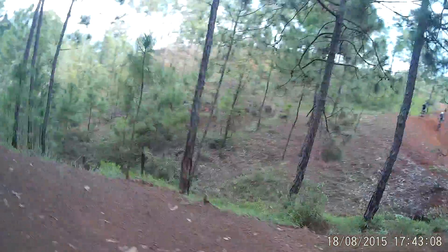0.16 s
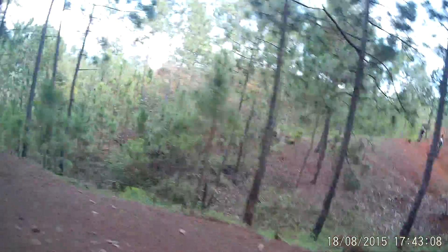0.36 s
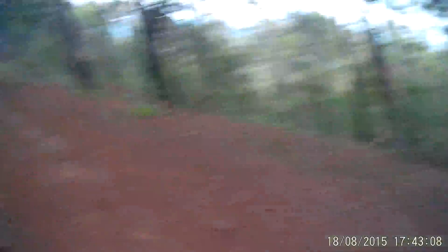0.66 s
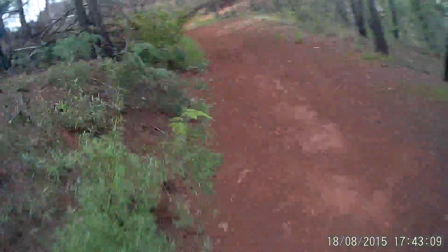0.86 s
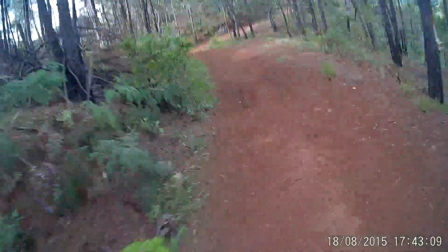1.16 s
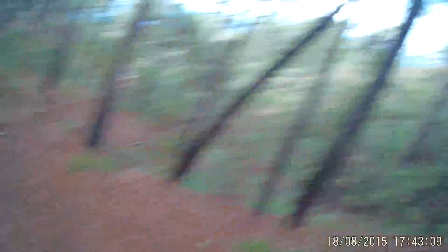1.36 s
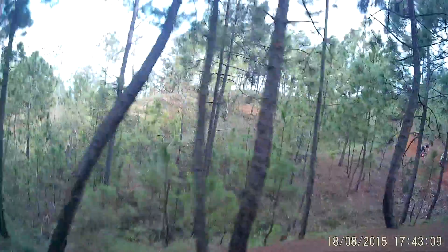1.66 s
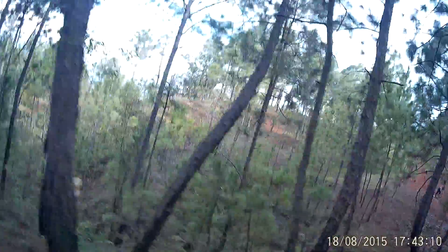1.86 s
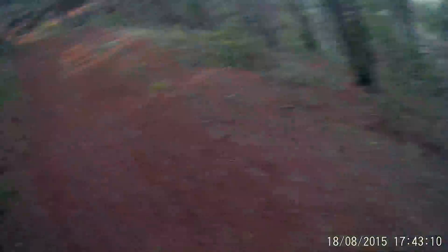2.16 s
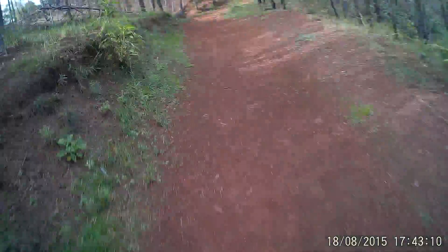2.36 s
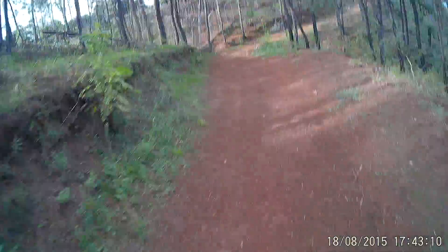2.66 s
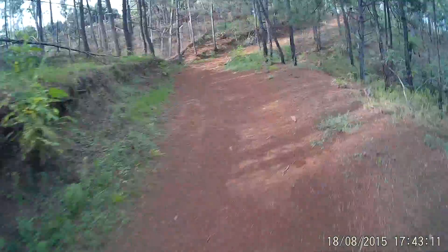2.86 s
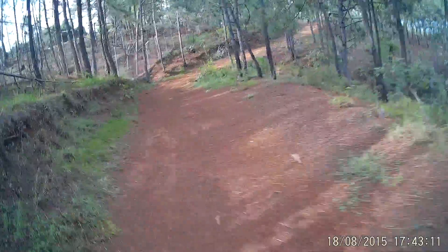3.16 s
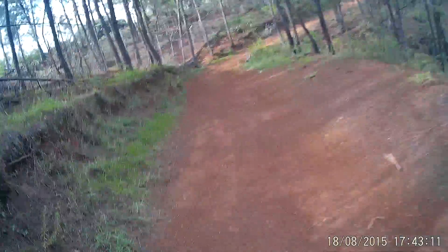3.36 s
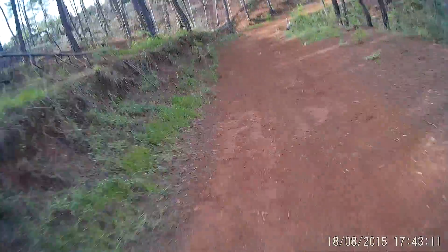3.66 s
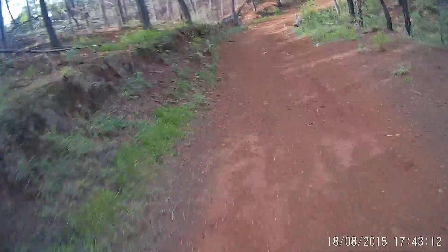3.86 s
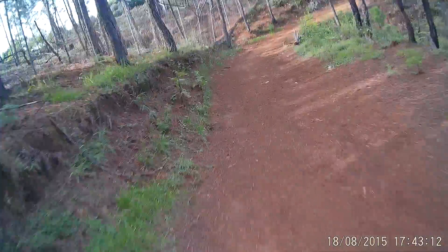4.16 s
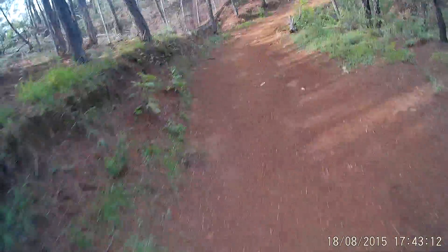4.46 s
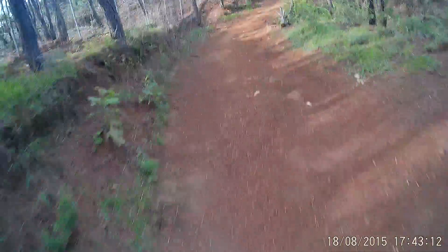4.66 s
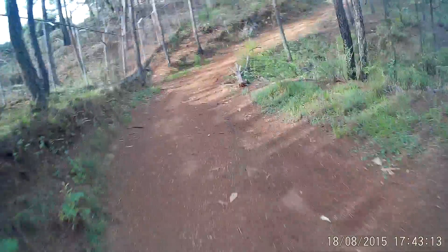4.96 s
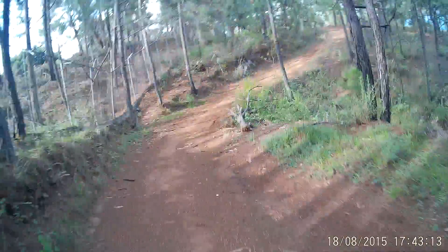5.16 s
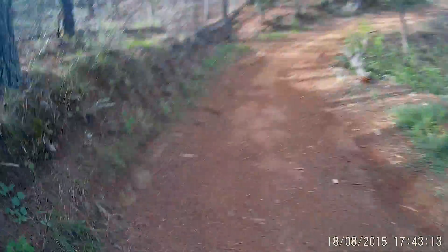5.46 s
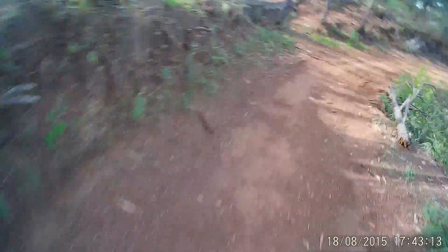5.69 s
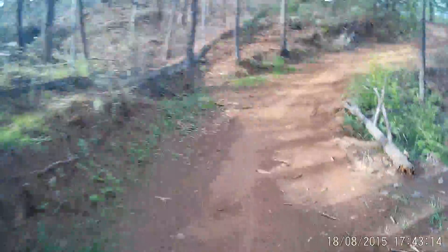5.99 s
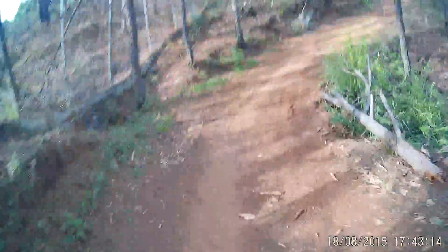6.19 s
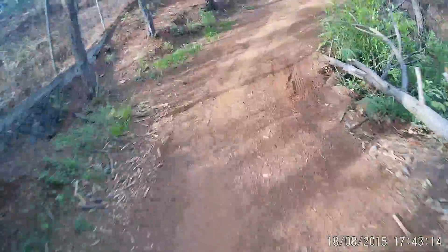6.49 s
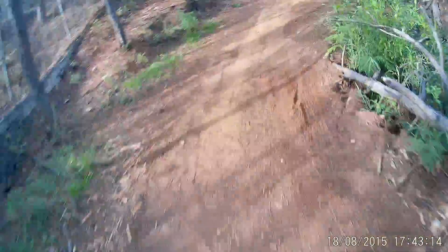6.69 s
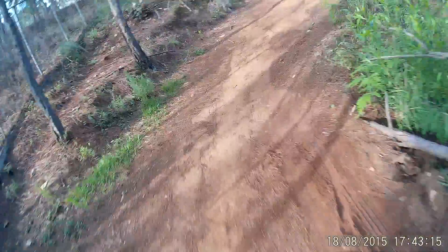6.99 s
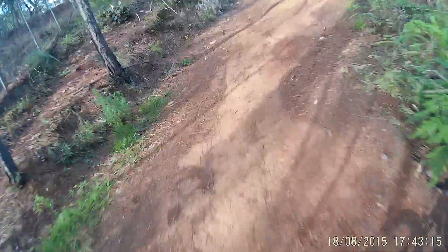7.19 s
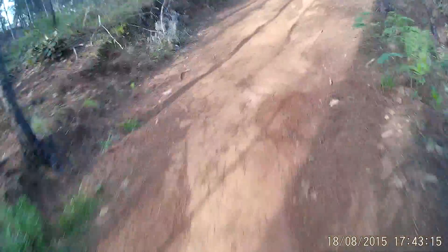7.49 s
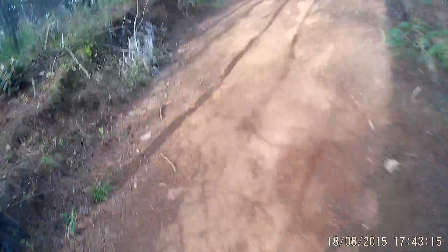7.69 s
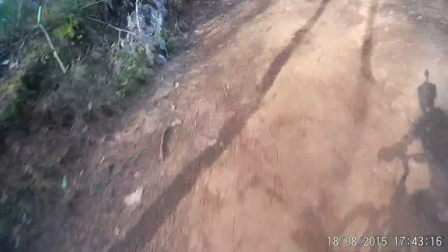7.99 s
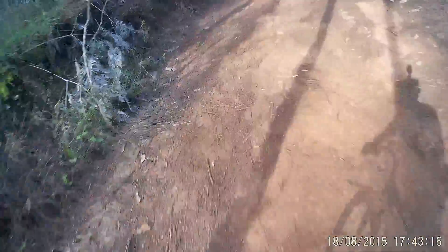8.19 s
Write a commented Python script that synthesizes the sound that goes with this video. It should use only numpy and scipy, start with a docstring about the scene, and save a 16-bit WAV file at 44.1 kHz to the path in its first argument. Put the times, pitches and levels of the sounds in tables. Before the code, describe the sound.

Close, boxy and muffled handling noise from a bike-mounted camera on a forest dirt path: hollow plastic raps, bright snapping of loose parts, low mount thumps and brief creaky squeaks. Busy at first, calmer in the middle with only small ticks and soft rumble, then busy again, ending in a furious burst of chatter and a few last taps. Faint tyre hiss and a very weak high whine lie underneath.

```python
"""A bike frame sways and buzzes throughout, with faint tyre hiss, as a mountain bike jolts along rough dirt.
A camera in a plastic case on the bike hears it: filtered noise makes the sway and hiss, random grains the rattle.
Small stones tick, loose parts clack, and the case squeaks in its clamp as friction noise in high resonances.
Bumps knock the case as chattering force through resonances and rock its mount as damped modes.
A few blows leave a steel part ringing."""
import sys
import numpy as np
from scipy import signal
from scipy.fft import rfft, irfft, next_fast_len
from scipy.io import wavfile
from scipy.ndimage import uniform_filter1d, map_coordinates

SR = 44100
rng = np.random.default_rng(int(sys.argv[2]) if len(sys.argv) > 2 else 0)


def waveform_to_disk(signal):
    """Save audio, clipped to [-1, 1], as 16-bit WAV at the path in sys.argv[1]."""
    frames = np.transpose(np.atleast_2d(signal))
    scaled = np.clip(frames, -1, 1) * 32767
    samples = np.round(scaled).astype(np.int16)
    wavfile.write(sys.argv[1], SR, samples)


N = 367794


def amp(db):
    """Decibel law: 20 dB is a tenfold amplitude."""
    return 10 ** (np.asarray(db) / 20)


def unit(x):
    """Mean-square normalisation: scaled to rms 1."""
    return x / np.sqrt(np.mean(x ** 2) + 1e-20)


def crest(x, size=220):
    """Short-time normalisation: the most energetic window of size samples gets rms 1."""
    power = uniform_filter1d(x ** 2, size, mode="constant")
    return x / np.sqrt(power.max() + 1e-20)


def curves(rows):
    """Linear interpolation: one value per sample for each column after the time."""
    times_s, *columns = np.transpose(rows)
    return [np.interp(np.arange(N) / SR, times_s, column) for column in columns]


def wobble(rate):
    """Slow random modulation: a smooth curve through rate random knots a second."""
    knots = rng.standard_normal(int(N * rate / SR) + 4)
    return map_coordinates(knots, [np.arange(N) * rate / SR])


def filtered(x, response):
    """Linear filtering: the spectrum of x times a response of frequency."""
    size = next_fast_len(len(x) + 4096) * 2  # zero padding leaves room for the response to die away
    spectrum = rfft(x, size) * response(np.fft.rfftfreq(size, 1 / SR))
    return irfft(spectrum, size)[:len(x)]


def colour(points):
    """Spectral envelope: gain through (Hz, dB) points on a log frequency axis."""
    points_hz, points_db = np.transpose(points)
    return lambda f: amp(np.interp(np.log(f + 1), np.log(points_hz), points_db))


def causal(gain):
    """Causality: the minimum-phase response with this gain, so nothing sounds before the blow."""
    cepstrum = irfft(np.log(np.maximum(gain, 1e-6)))
    half = len(cepstrum) // 2
    folded = np.r_[cepstrum[0], 2 * cepstrum[1:half], np.zeros(half)]
    return np.exp(rfft(folded))


def body(modes):
    """Modal superposition: a sum of resonances of alternating sign, each (Hz, width Hz, dB)."""
    def response(f):
        total = 0
        for k, (hz, width, db) in enumerate(modes):
            resonance = 1j * f * width / (hz * hz - f * f + 1j * f * width)
            total = total + (-1) ** k * amp(db) * resonance
        return total
    return response


def struck(modes, scatter_db):
    """Modal excitation: each point of contact favours other resonances."""
    return body([(hz, width, db + scatter_db * rng.standard_normal()) for hz, width, db in modes])


def soft(cut_hz, order):
    """Compliant contact: a yielding surface is a low-pass filter."""
    b, a = signal.butter(order, 1, analog=True)
    return lambda f: np.polyval(b, 1j * f / cut_hz) / np.polyval(a, 1j * f / cut_hz)


def ring(modes, t, detune):
    """Free vibration: exponentially damped modes, a little different at each blow."""
    total = 0
    for hz, db, t60 in modes:
        decay = amp(db + rng.normal(0, 0.64) - 60 * t / t60)
        pitch_hz = hz * np.exp(detune * rng.normal())
        total = total + decay * np.sin(2 * np.pi * pitch_hz * t)
    return total


def contact(t, attack, t60, tail_db, tail_t60):
    """Chattering contact, harder or softer each time: a burst of tiny blows, then a weak buzz (times in s)."""
    softness = np.exp(0.5 * rng.standard_normal())
    rise = 1 - np.exp(-t / (attack * softness ** 2))
    fall = amp(-60 * t / t60) + amp(tail_db - 60 * t / tail_t60)
    return rise * fall * rng.laplace(size=len(t))


def grains(rate, spread_db):
    """Random impulse process: on average rate tiny blows a second, of random size."""
    happens = rng.random(N) < rate / SR
    return happens * rng.standard_normal(N) * amp(spread_db * rng.standard_normal(N))


def add(track, s, sound):
    """Superposition: mix a sound in at time s."""
    start = max(round(s * SR), 0)
    part = track[start:start + len(sound)]
    part += sound[:len(part)]


def strains():
    """Combined flexure as (s, dB): most where a bump both rocks the camera and jars the lid, little at a rap."""
    flex_grows = 1.51  # dB of strain for each dB of the weaker of treble and thump
    return [(s, db + flex_grows * min(treble_db, thump_db)) for s, db, treble_db, thump_db in KNOCKS]


def jolts(bumps, db, grows, rise_s, t60):
    """Energy build-up and decay: power of the shaking that swells into each (s, dB) bump, then dies away.
    An average bump gives db; a harder one adds grows dB for each dB."""
    power, t = np.zeros(N + SR), np.arange(-SR // 10, SR // 3) / SR
    shape_db = -60 * np.maximum(-t / rise_s, t / t60)
    average_db = np.mean([level for s, level in bumps])
    for s, level in bumps:
        # a second of lead-in makes room for the earliest swells
        add(power, 1 + s + t[0], amp(db + grows * (level - average_db) + shape_db) ** 2)
    return power[SR:]


# roughness of the trail, a base for several layers: start_s [s], level_db [dB]
GROUND_ROUGHNESS = [(0.0, -53), (0.23, -65), (0.74, -60), (1.21, -65.5), (1.92, -55.5), (2.49, -66.5),
                    (2.95, -63.5), (4.41, -71.5), (4.62, -57), (5.04, -70), (5.29, -54), (6.06, -62),
                    (6.22, -54), (7.08, -57), (7.39, -56.5), (7.62, -40), (7.94, -68), (8.34, -54.5)]
# relative spectrum of the frame's slow sway: pitch_hz [Hz], level_db [dB per Hz]
SWAY_SPECTRUM = [(12, -1.5), (24, -6.5), (37, -1.5), (60, -12.5), (100, -21), (250, -44.5), (600, -105)]
# relative spectrum of the frame's buzz: pitch_hz [Hz], level_db [dB per Hz]
JUDDER_SPECTRUM = [(40, -21.5), (90, -19), (155, 5.5), (195, 5.5), (250, -27), (400, -23.5), (1000, -35),
                   (3000, -84)]
# resonances of the rubbing case: pitch_hz [Hz], width_hz [Hz], relative level_db [dB]
RUB_RESONANCES = [(2240, 190, -1.5), (2970, 500, -2.5), (4170, 230, 1), (5080, 310, 1.5), (6450, 100, -9),
                  (8860, 140, -2.5)]


def shaking():
    """Forced vibration: rough ground sways the frame and makes the case buzz and rub; bumps add power."""
    sway_lag_s = 0.0097  # the frame swings furthest this long after a knock
    ground_db, = curves(GROUND_ROUGHNESS)
    thumps = [(s, db + thump_db) for s, db, treble_db, thump_db in KNOCKS]
    late_thumps = [(s + sway_lag_s, db) for s, db in thumps]
    late_strains = [(s + sway_lag_s, db) for s, db in strains()]

    def level(steady_db, stirred_power):
        """Incoherent addition: powers add."""
        return np.sqrt(amp(steady_db) ** 2 + stirred_power)

    sway_stirred = jolts(late_strains, db=-42.0, grows=0.7, rise_s=0.067, t60=0.14)
    judder_stirred = jolts(late_thumps, db=-47.5, grows=0.9, rise_s=0.093, t60=0.14)
    rattle_stirred = jolts(thumps, db=-56, grows=0.58, rise_s=0.064, t60=0.2)
    sway_level = level(ground_db + 9 + 3 * wobble(11), sway_stirred)
    judder_level = level(ground_db - 7.0, judder_stirred)
    rattle_level = level(ground_db - 6.0, rattle_stirred)
    unevenness = amp(2.0 * wobble(35))
    sway = sway_level * unit(filtered(rng.standard_normal(N), colour(SWAY_SPECTRUM)))
    judder = judder_level * unit(filtered(rng.standard_normal(N), colour(JUDDER_SPECTRUM)))
    rattle_grains = grains(rate=750, spread_db=4.5)
    rattle = amp(-1.0) * rattle_level * unit(filtered(rattle_grains, body(WALL_RESONANCES)))
    rub_grains = grains(rate=3700, spread_db=3.5)
    rub = amp(-6) * rattle_level * unit(filtered(rub_grains, body(RUB_RESONANCES)))
    return sway + unevenness * (judder + rattle + rub)


# relative spectrum of the hiss: pitch_hz [Hz], level_db [dB per Hz]
HISS_SPECTRUM = [(120, -13), (200, 0), (490, -7.5), (633, -4.5), (719, -12), (1830, -16.5), (2400, -11.5),
                 (3660, -15), (9470, -17), (14400, -18.5), (15800, -14.5)]
# course of the hiss, before a common gain: start_s [s], level_db [dB]
HISS_LEVEL = [(0.0, -68), (0.25, -71), (2.04, -64.5), (2.6, -72.5), (3.0, -70), (4.46, -69.5), (4.62, -61),
              (7.8, -70), (8.34, -69)]


def air():
    """Broadband noise and modulation: faint hiss of tyres and air, and the camera's pulsing electrical whine."""
    hiss_db, = curves(HISS_LEVEL)
    hiss = amp(hiss_db + 4.5) * unit(filtered(rng.standard_normal(N), colour(HISS_SPECTRUM)))
    pulse_hz = 36 + 3 * wobble(8.5)
    pulsing = 1 + .8 * np.sin(2 * np.pi * np.cumsum(pulse_hz) / SR)
    whine_hz = 9522 + 6 * wobble(12)
    whine = pulsing * np.sin(2 * np.pi * np.cumsum(whine_hz) / SR)
    return hiss + amp(-82.5) * whine


def ticks():
    """Impulse excitation: small stones tap the case's walls and lid at random, harder on rough ground."""
    ground_db, = curves(GROUND_ROUGHNESS)
    taps = grains(rate=30, spread_db=-4.0)
    walls = unit(filtered(taps, body(WALL_RESONANCES)))
    lid = unit(filtered(taps, body(LID_RESONANCES)))
    return amp(ground_db - 10.5) * (walls + amp(-6) * lid)


# loose parts clacking, before a common gain: start_s [s], level_db [dB], pitch_hz [Hz]
CLACKS_OF_PARTS = [(0.023, -28, 5300), (0.04, -38.5, 4770), (0.497, -37, 3700), (0.6767, -13.5, 5440),
                   (0.6862, -10, 5350), (0.691, -27.5, 4800), (0.7209, -24.5, 5300), (0.8357, -32.5, 5030),
                   (1.2174, -21.5, 5240), (1.247, -39.5, 4400), (1.262, -40, 4870), (1.4733, -26, 3550),
                   (1.5624, -35, 2520), (1.5651, -15.5, 4400), (1.6743, -24, 5300), (1.697, -19, 3630),
                   (1.7032, -21, 4570), (1.7758, -19, 4230), (1.7859, -19, 6600), (2.0303, -13.5, 3750),
                   (2.0442, -22, 4400), (2.1138, -34, 5100), (2.2681, -32.5, 2550), (2.2991, -35, 4470),
                   (2.739, -41, 4430), (3.62, -42, 4360), (4.52, -29.5, 2920), (4.576, -29.5, 4770),
                   (5.009, -39.5, 3100), (5.118, -24.5, 4250), (5.1296, -33, 4300), (5.2044, -18, 5100),
                   (5.2093, -16.5, 5300), (5.304, -20.5, 6360), (5.332, -31.5, 4070), (5.383, -20.5, 3730),
                   (5.3932, -32, 3190), (5.442, -37, 5060), (5.514, -43, 5030), (5.5962, -18, 4540),
                   (5.6016, -35, 3900), (5.6054, -19, 4240), (5.6184, -18, 4700), (5.6198, -15.5, 2700),
                   (5.6535, -30.5, 2610), (5.722, -33.5, 5500), (6.06, -28.5, 4060), (6.151, -40, 4460),
                   (6.308, -27, 4880), (6.384, -31, 3140), (6.3934, -28, 3020), (7.044, -38.5, 5130),
                   (7.158, -23.5, 5330), (7.3363, -39.5, 5200), (7.4462, -27, 5300), (7.9748, -31.5, 4140),
                   (8.2025, -25, 5200), (8.29, -36.5, 4450)]
# colour of a clack and of the sharp edge of a knock: pitch_hz [Hz], relative level_db [dB per Hz]
CLACK_SPECTRUM = [(150, -32), (500, -18), (1200, -11), (2300, -9), (3700, 0), (5300, -1), (7700, -4),
                  (9000, -12), (12000, -19), (16000, -27)]


def clacks():
    """Hard impact: little parts snap together, each with its own bright pitch; the lower, the duller."""
    out, t = np.zeros(N), np.arange(SR // 12) / SR
    for s, db, centre_hz in CLACKS_OF_PARTS:
        def pitched(f):
            """Spectral peak: a bump at the pitch on a tilted envelope."""
            tilt_db = 7 * np.log2(centre_hz / 5100) * np.log2(np.maximum(f / 3000, 1))
            peak_db = 8.5 * np.exp(-(np.log((f + 1) / centre_hz) / 0.077) ** 2)
            return causal(colour(CLACK_SPECTRUM)(f) * amp(tilt_db + peak_db))

        force = contact(t, attack=0.00025, t60=0.01, tail_db=-12, tail_t60=0.036)
        add(out, s + .0004, amp(db - 10.0) * crest(filtered(force, pitched)))
    return out


# upper resonances that a slip excites: pitch_hz [Hz], width_hz [Hz], relative level_db [dB]
UPPER_SLIP = [(7080, 100, -7.5), (6840, 570, -18.5), (9050, 350, -51)]
# lower resonances that a slip excites: pitch_hz [Hz], width_hz [Hz], relative level_db [dB]
LOWER_SLIP = [(2350, 210, -5), (3050, 400, -23.5), (4150, 150, -18), (5110, 130, 5.5)]


def squeaks():
    """Sliding friction: as the mount flexes, plastic slips on plastic, a short swell in two sets of resonances."""
    slip_lead_s = 0.001  # a slip peaks just before its knock
    upper_db, lower_db, scatter_db = -14, -16.5, 1.5  # the first two re the strain
    out, t = np.zeros(N), np.arange(-SR // 50, SR // 50) / SR
    swell = np.exp(-np.abs(t / 0.0064) ** 4)

    def friction(modes):
        """Resonant friction: noise through resonances, stronger or weaker each time."""
        noise = rng.standard_normal(len(t))
        return amp(scatter_db * rng.standard_normal()) * unit(filtered(noise, struck(modes, scatter_db=3.5)))

    for s, db in strains():
        squeak = amp(upper_db) * friction(UPPER_SLIP) + amp(lower_db) * friction(LOWER_SLIP)
        add(out, s - slip_lead_s + t[0], amp(db) * swell * squeak)
    return out


# bumps knocking the case, before each part's own gain:
# start_s [s], level_db [dB], treble_db [dB re level_db], thump_db [dB re level_db]
KNOCKS = [(0.047, -32.5, 0, -2), (0.088, -38.5, 0.5, -5), (0.138, -15.5, -1.5, -15.5),
          (0.183, -25.5, -14, -17), (0.19, -28, -31, -5.5), (0.384, -46.5, -21, -3), (0.408, -36, -14, -20),
          (0.468, -29.5, -9, -34), (0.484, -23, -1.5, -7.5), (0.537, -40.5, -13, -2), (0.628, -17, -8, -15),
          (0.653, -37, -24, -22), (0.659, -27, -20.5, -6), (0.676, -16, -15, -4), (0.732, -26, -14, -9.5),
          (0.751, -31, 1, -12), (0.772, -25, -1.5, -5.5), (0.902, -35, -1.5, -15),
          (0.909, -30.5, -14.5, -22), (1.011, -46.5, -23, -3.5), (1.117, -32, -2, 0),
          (1.209, -23.5, -6, -12), (1.435, -41, -12, -10), (1.467, -26, 6, -5.5), (1.553, -18, -2.5, -12.5),
          (1.606, -44.5, -29, -1), (1.685, -21.5, 3, -8), (1.756, -21, -6, -11), (1.833, -31.5, -10, -34.5),
          (1.893, -28, -10, -21.5), (1.923, -31.5, 0.5, -4), (1.963, -19.5, -4.5, -10.5),
          (2.018, -19, -1, -7), (2.192, -33, -13, -20), (2.199, -26, -10.5, -15), (2.406, -47, 0, 5),
          (2.599, -49, -37, -15), (2.678, -31, -4, -6), (2.758, -46.5, -3, -0.5),
          (2.798, -34.5, -13.5, -6.5), (2.913, -42, -27, -4.5), (2.967, -48.5, 2, 5),
          (3.137, -37, -6, -4.5), (3.438, -44.5, -4, -3.5), (3.45, -28.5, -16, -19),
          (3.578, -31.5, 3.5, -4), (3.704, -49.5, -2, -3.5), (3.911, -49, -5, -3.5), (3.939, -55, 2, -5),
          (4.004, -39.5, -3.5, -3.5), (4.445, -24, -4, -16.5), (4.461, -29.5, -10.5, -16),
          (4.503, -41.5, 8.5, -12), (4.563, -30, -2, -4), (4.596, -31.5, -20, -35.5),
          (4.645, -39.5, -6, -5), (4.655, -25.5, -7.5, -16), (4.758, -37.5, -6.5, -6.5),
          (4.832, -21, -6.5, -18), (4.957, -30, -0.5, -3), (5.083, -35, -6, -8), (5.094, -23, -2, -13.5),
          (5.141, -27.5, -18, -8.5), (5.163, -21.5, -2, -6), (5.198, -32.5, 8, -16.5),
          (5.286, -22.5, -1, -15), (5.339, -38, -16, -5), (5.374, -27, 1.5, -4.5),
          (5.536, -29, -3.5, -21.5), (5.55, -31, -13, -20.5), (5.599, -31.5, -13, -19),
          (5.62, -23.5, -23, -13), (5.689, -39, 8, -10.5), (5.728, -34.5, -26, -2.5),
          (5.787, -42, -27, 4.5), (5.819, -24, -1.5, -8), (5.988, -28.5, -3.5, -8.5), (6.009, -32, -16, -1),
          (6.036, -39.5, -15, -4), (6.053, -29.5, -6, -11), (6.074, -23.5, -9, -12.5),
          (6.104, -60, -12, 3.5), (6.184, -41, -13, -16.5), (6.212, -17.5, -1, -6.5),
          (6.324, -20, -6.5, -28.5), (6.337, -33.5, -6, -4.5), (6.357, -29.5, -11, -27),
          (6.401, -38.5, 10, -15.5), (6.419, -48.5, -24, -3), (6.529, -30, -10.5, -13.5),
          (6.581, -34.5, -8.5, -27.5), (6.634, -31, -25, -10), (6.662, -23, -6.5, -9),
          (6.686, -12.5, -4, -21), (6.708, -30.5, -25, 1), (6.749, -35.5, -32, -20),
          (6.807, -21.5, 2.5, -10.5), (6.829, -31.5, -1.5, -3.5), (6.842, -31.5, -11, -14.5),
          (6.997, -26.5, 1, -4), (7.148, -24.5, 0, -35), (7.168, -30, -25, -9), (7.197, -43, 2, 4.5),
          (7.312, -25, -9.5, -23), (7.425, -23.5, 1.5, -6), (7.468, -31.5, -10, 3), (7.494, -18, -2, -10),
          (7.517, -19.5, -8, -25), (7.527, -22, -4, -11), (7.548, -21, -20, -17), (7.567, -24, 1, -0.5),
          (7.591, -19.5, -10, -20), (7.602, -20, -6, -10), (7.618, -18.5, -29, -16), (7.633, -15.5, 1, -6),
          (7.669, -34.5, -12, -3.5), (7.681, -29.5, -3, -13.5), (7.698, -25, -6, -20.5),
          (7.718, -20, -34, -9.5), (7.735, -20.5, -2, -7.5), (7.781, -35.5, -6, -22),
          (7.823, -36.5, -7, -6), (7.862, -27, -7, -18.5), (7.962, -29.5, 2, -11), (8.192, -34, 5, -2.5),
          (8.249, -34.5, -10, -20), (8.268, -31.5, -14, -14)]
# the case's walls: pitch_hz [Hz], width_hz [Hz], relative level_db [dB]
WALL_RESONANCES = [(610.3, 59, 4), (958, 143, 2), (1192, 162, 1.5), (1446, 75, 2), (1602, 81, 1),
                   (1993, 110, -7), (2317, 115, -4.5), (2950, 167, -7.5)]
# the case's thinner lid: pitch_hz [Hz], width_hz [Hz], relative level_db [dB]
LID_RESONANCES = [(2830, 1070, -5.5), (4094, 240, 7), (4300, 390, 6), (5380, 420, 4.5), (5700, 310, -6),
                  (6960, 305, -0.5), (7600, 120, -8), (7680, 200, -23), (9190, 330, -15.5),
                  (10400, 350, -23.5)]
# the camera swaying on its mount: pitch_hz [Hz], relative level_db [dB], t60_s [s]
MOUNT_MODES = [(41, -26.5, 0.083), (103.2, 1.5, 0.06), (151.4, 7, 0.13), (168.9, -8.5, 0.28)]


def knocks():
    """Impact excitation: each bump strikes the case's walls and lid and rocks the mount."""
    out, t, long = np.zeros(N), np.arange(SR // 10) / SR, np.arange(SR // 3) / SR
    for s, db, treble_db, thump_db in KNOCKS:
        wall_force = contact(t, attack=0.00062, t60=0.018, tail_db=-21.5, tail_t60=0.071)
        softened = filtered(wall_force, soft(cut_hz=2400, order=2))
        walls = crest(filtered(softened, struck(WALL_RESONANCES, scatter_db=0)))
        lid_force = contact(t, attack=0.0041, t60=0.017, tail_db=-24.0, tail_t60=0.039)
        lid = crest(filtered(lid_force, struck(LID_RESONANCES, scatter_db=4)))
        edge = crest(filtered(lid_force, lambda f: causal(colour(CLACK_SPECTRUM)(f))))
        treble = amp(db + treble_db - 9.5) * (lid + amp(-11.0) * edge)
        add(out, s + .0007, amp(db - 9.0) * walls + treble)
        thump = crest(ring(MOUNT_MODES, long, detune=0.092))
        add(out, s, amp(db + thump_db - 2.5) * thump)
    return out


# blows that leave a steel part of the bike ringing: start_s [s], level_db [dB]
STEEL_BLOWS = [(0.141, -46), (0.689, -46), (1.555, -50), (2.019, -51), (2.203, -65), (4.448, -48),
               (6.686, -46)]
# the steel part: pitch_hz [Hz], relative level_db [dB], t60_s [s]
STEEL_MODES = [(1050, 2, 0.17), (1124, -4.5, 0.34), (1545, -11.5, 0.65), (2270, -18, .35),
               (4090, -36, 0.07), (5900, -17, 0.34)]


def steel():
    """Lightly damped modes: a few blows leave a faint metallic note behind."""
    out, t = np.zeros(N), np.arange(SR // 2) / SR
    for s, db in STEEL_BLOWS:
        add(out, s, amp(db) * ring(STEEL_MODES, t, detune=0.0034))
    return out


def scene():
    """Transmission loss: the case's plastic swallows the top treble of all but the hiss and whine."""
    rattling = shaking() + ticks() + clacks() + squeaks() + knocks() + steel()
    muffled = filtered(rattling, soft(cut_hz=10500, order=3))
    return (muffled + air())[None]


def record(dry):
    """Band limitation: the camera keeps nothing above its upper limit."""
    top_hz = 15950
    return np.array([filtered(channel, lambda f: f < top_hz) for channel in dry])


dry = scene()
out = record(dry)
waveform_to_disk(out)
```